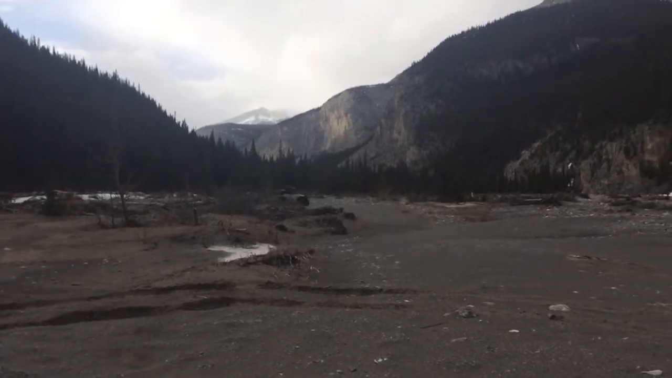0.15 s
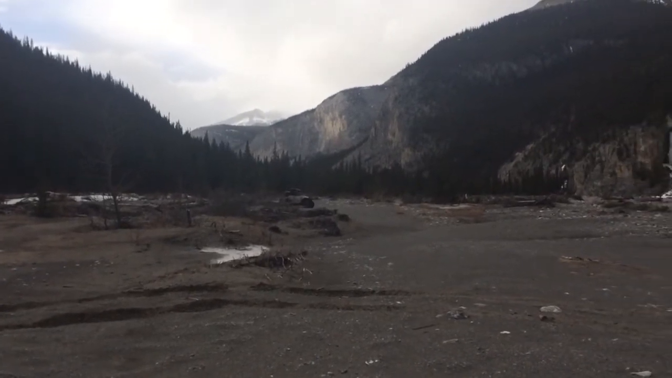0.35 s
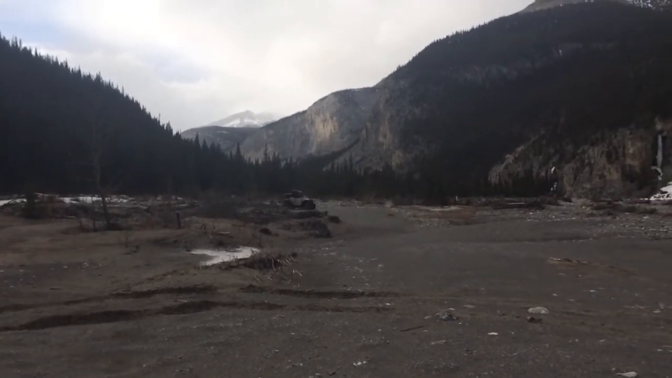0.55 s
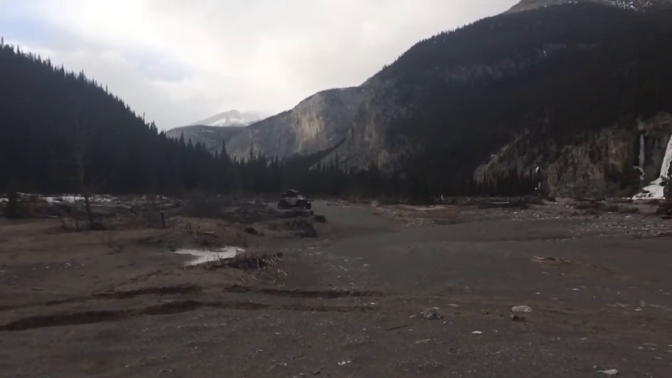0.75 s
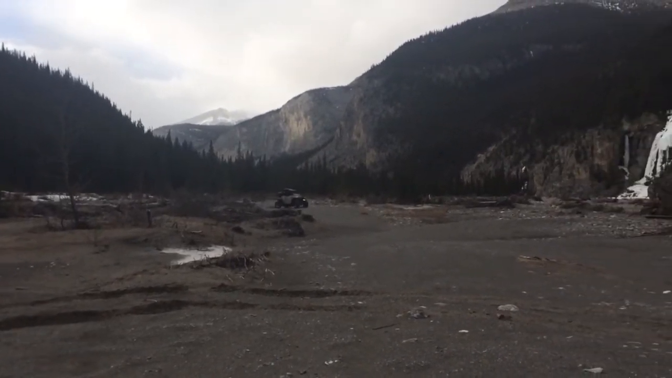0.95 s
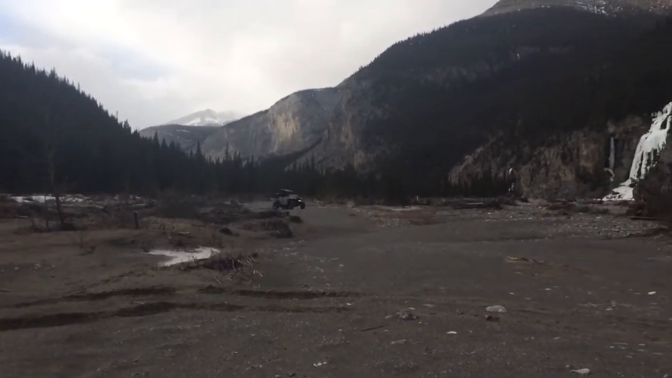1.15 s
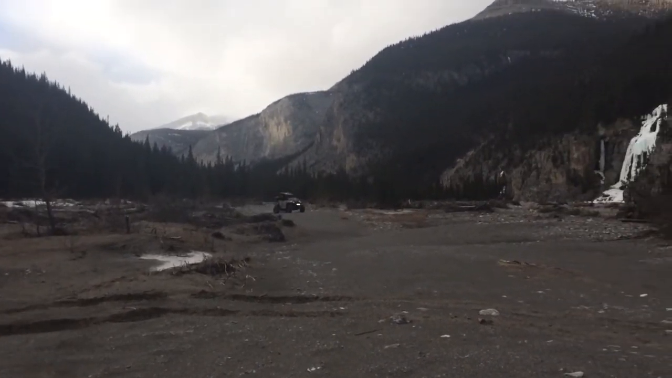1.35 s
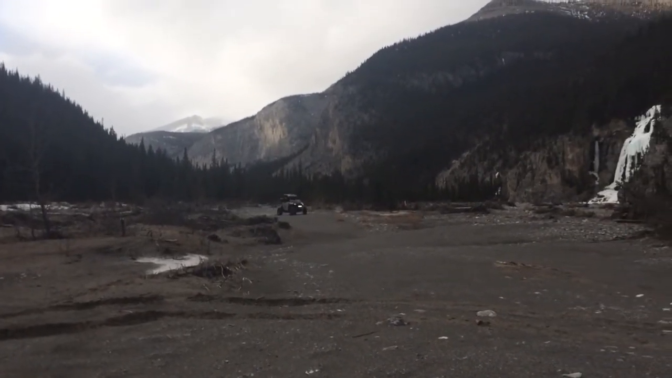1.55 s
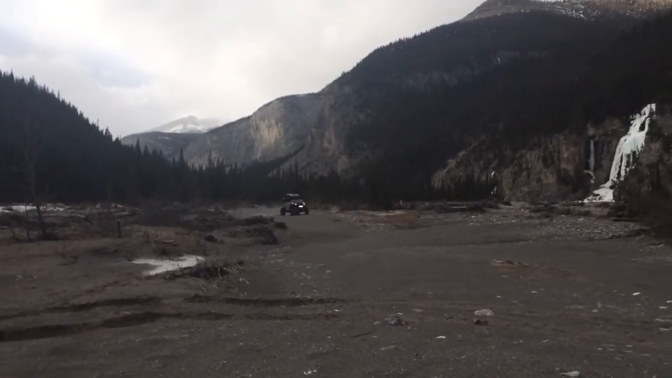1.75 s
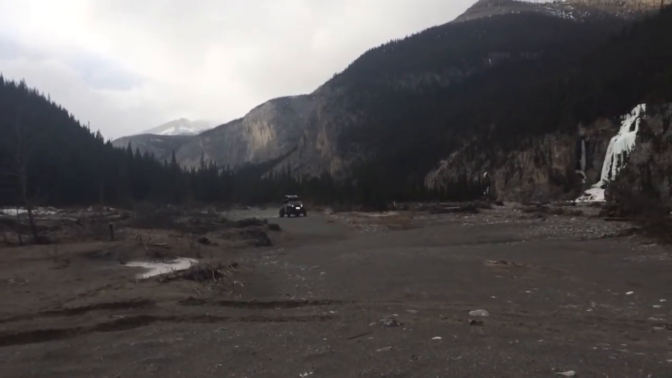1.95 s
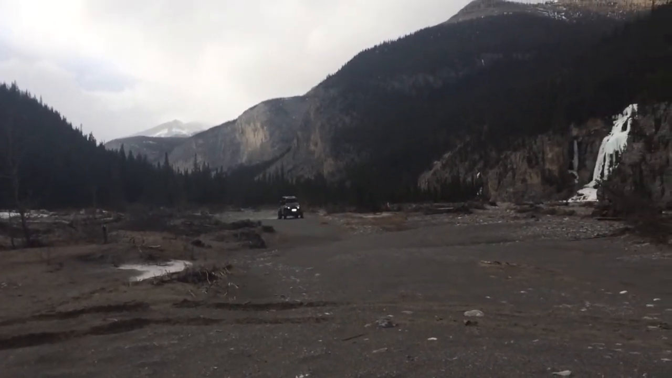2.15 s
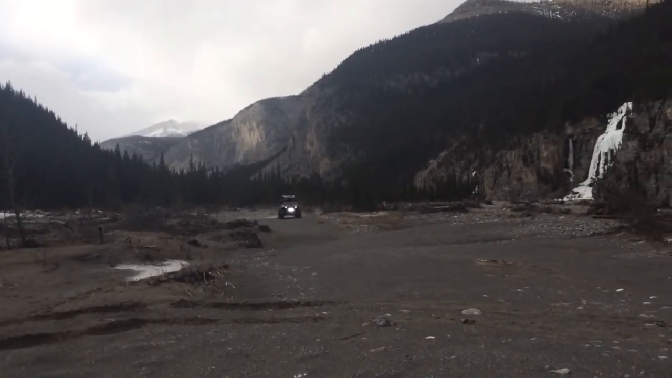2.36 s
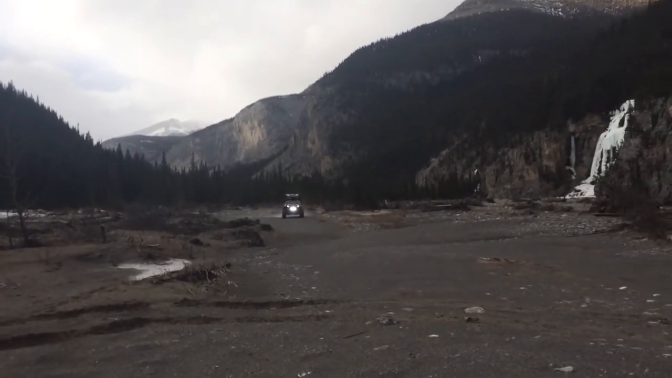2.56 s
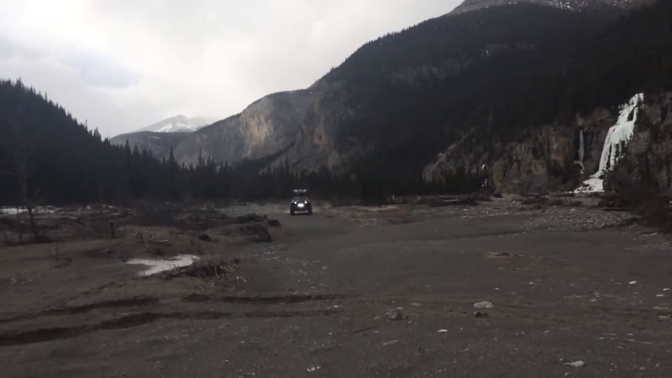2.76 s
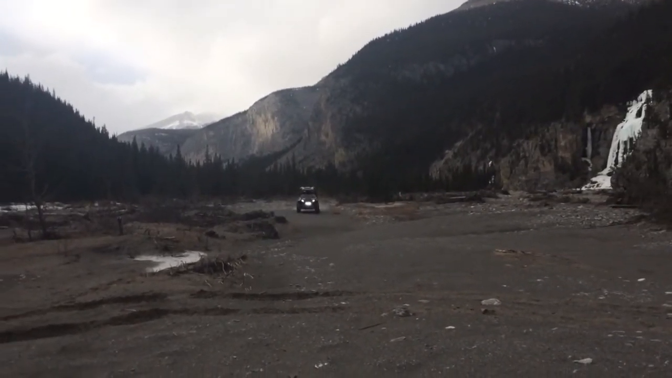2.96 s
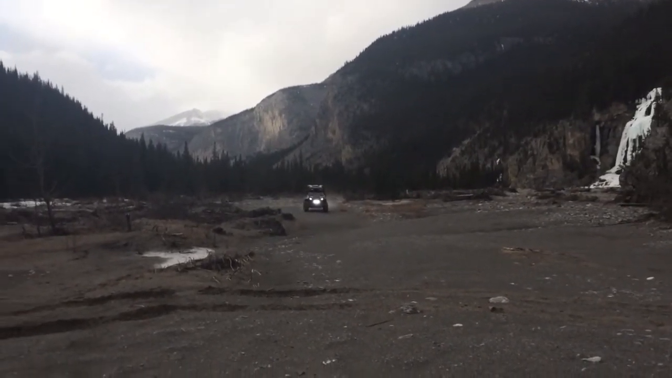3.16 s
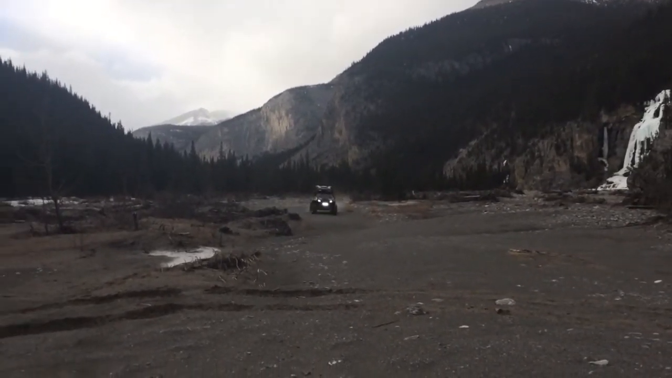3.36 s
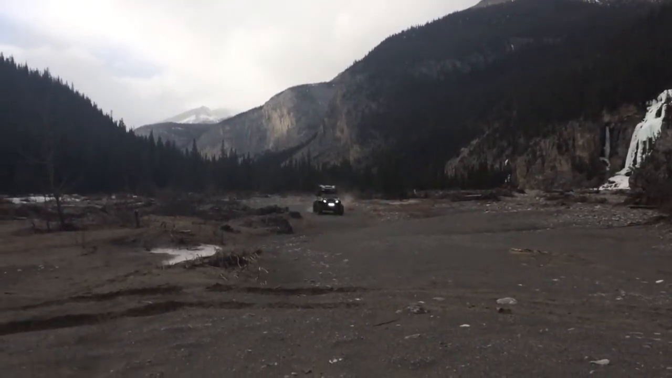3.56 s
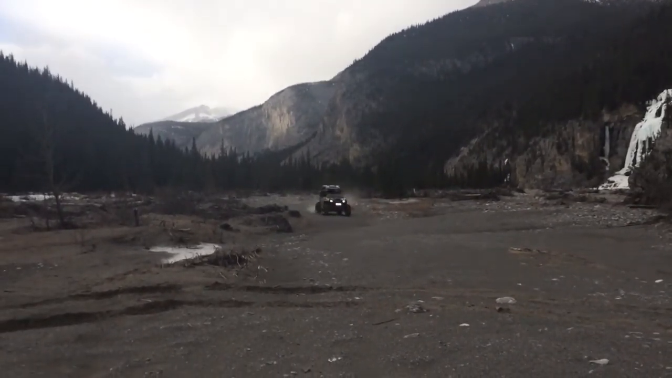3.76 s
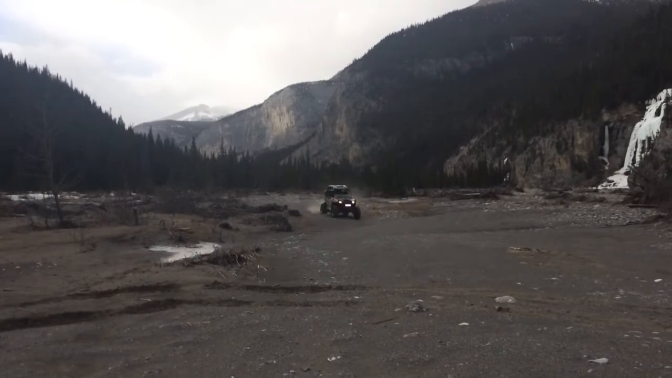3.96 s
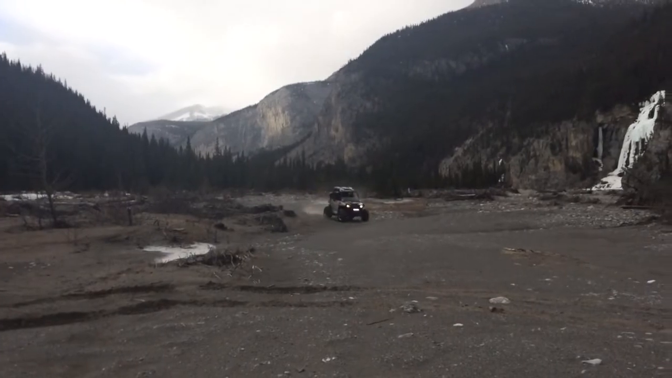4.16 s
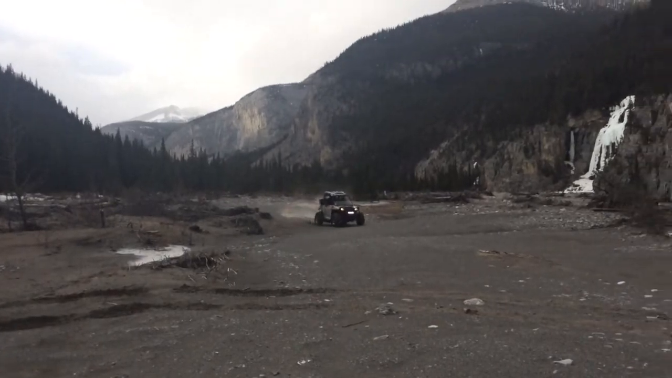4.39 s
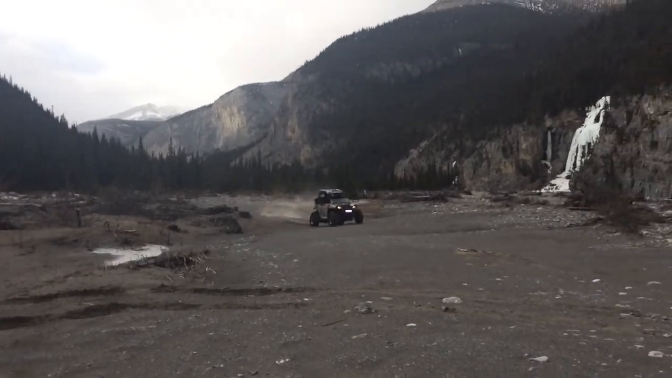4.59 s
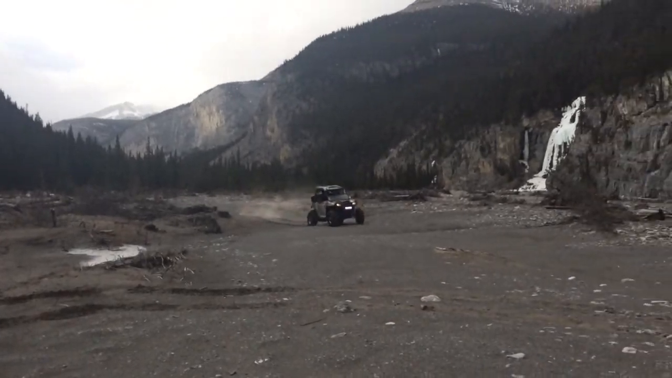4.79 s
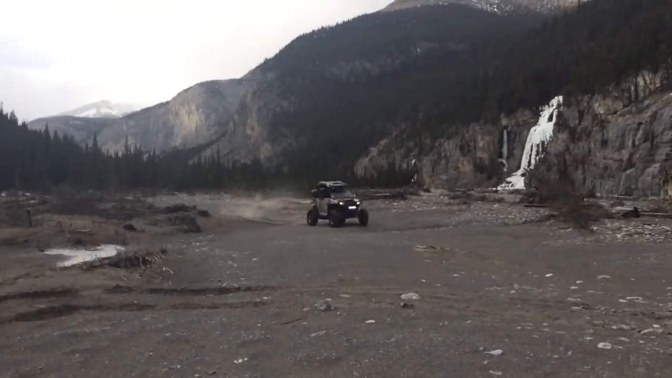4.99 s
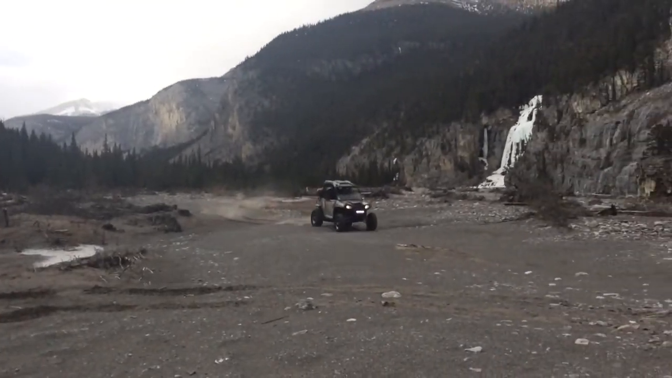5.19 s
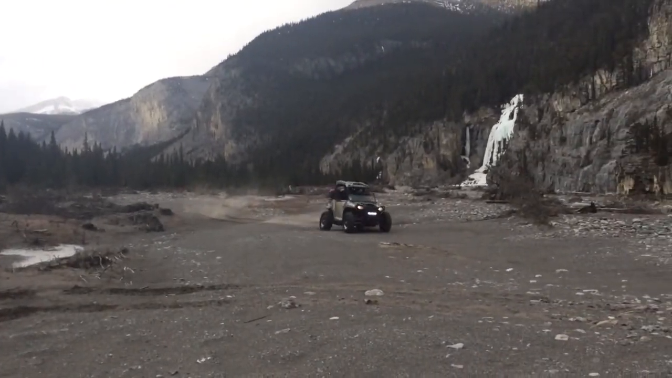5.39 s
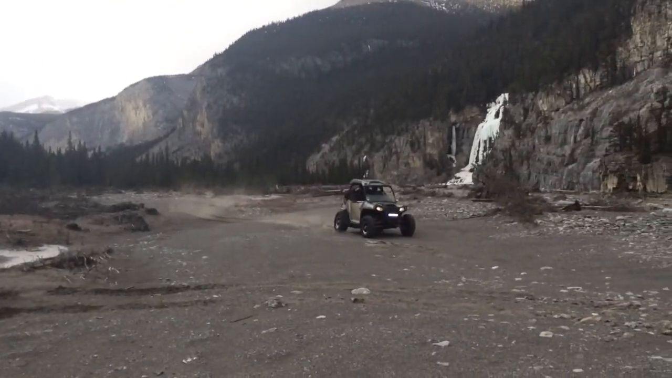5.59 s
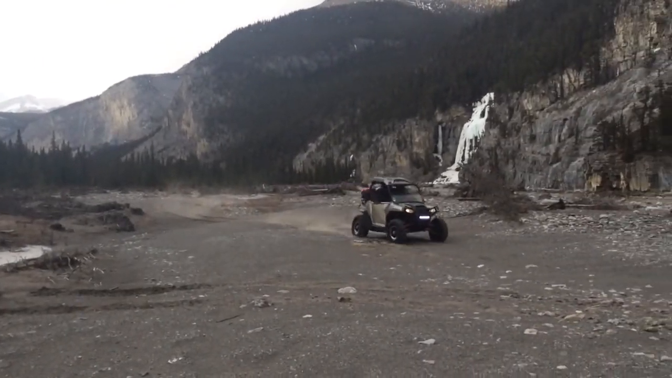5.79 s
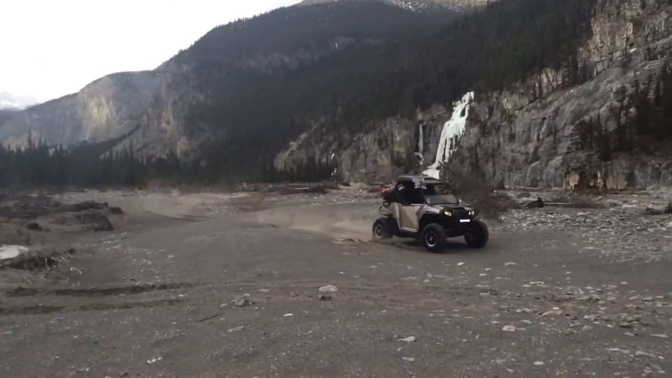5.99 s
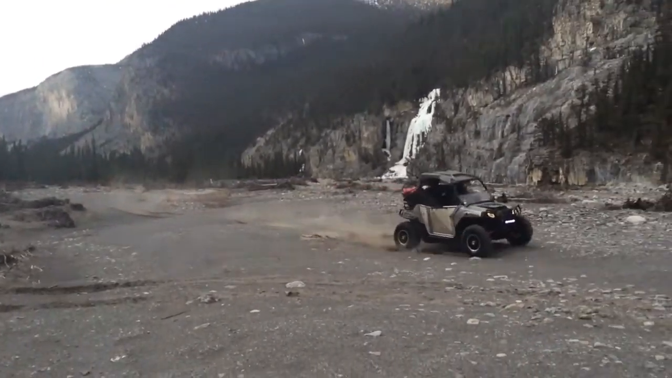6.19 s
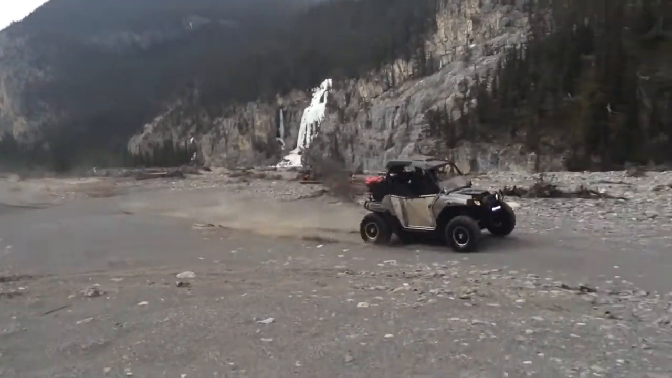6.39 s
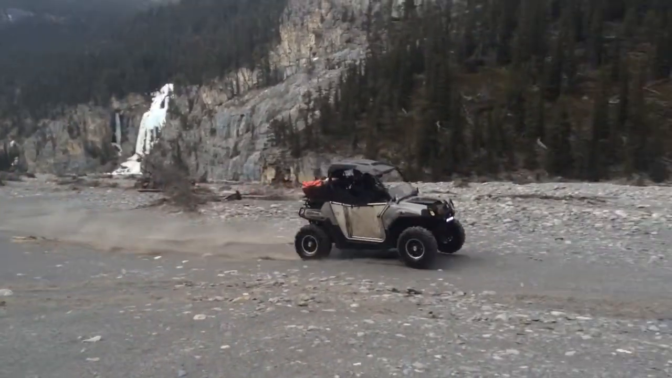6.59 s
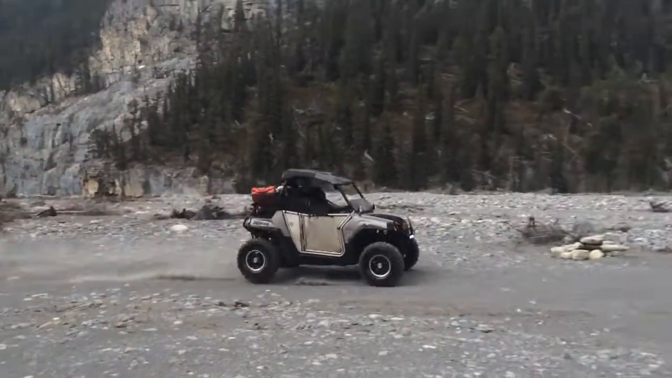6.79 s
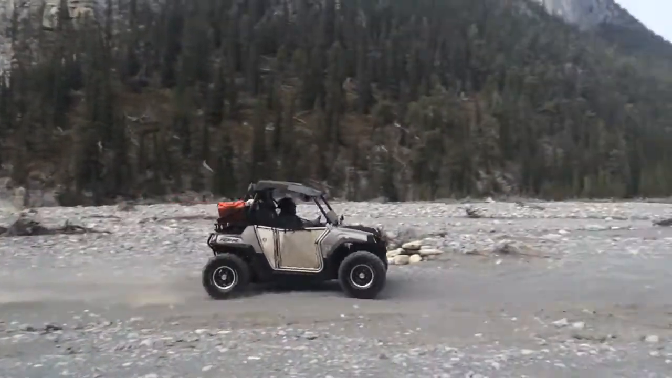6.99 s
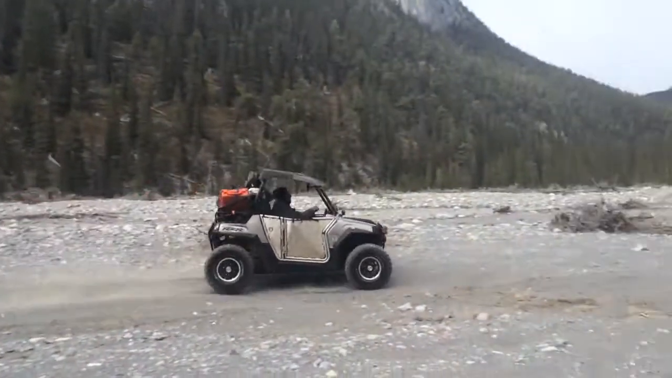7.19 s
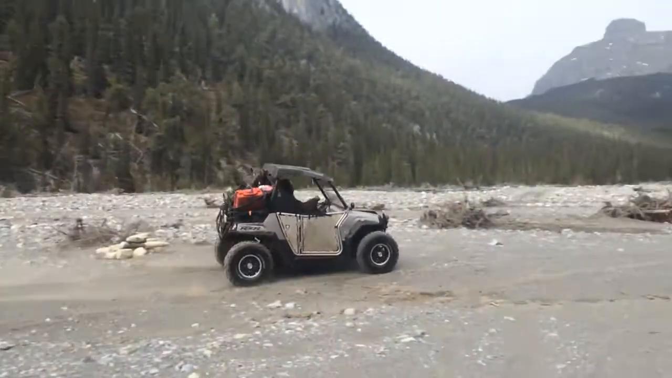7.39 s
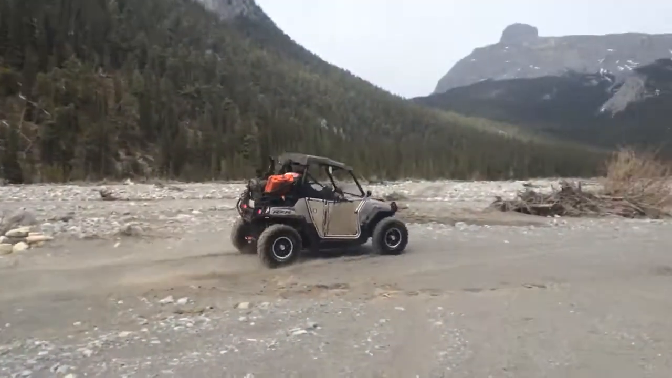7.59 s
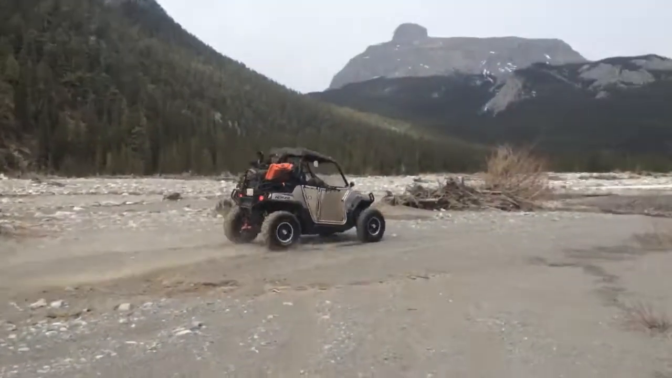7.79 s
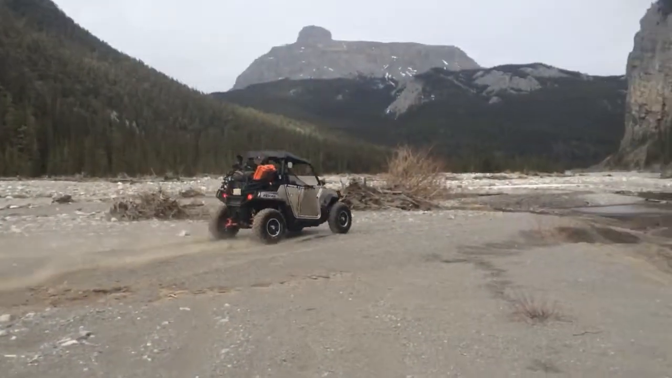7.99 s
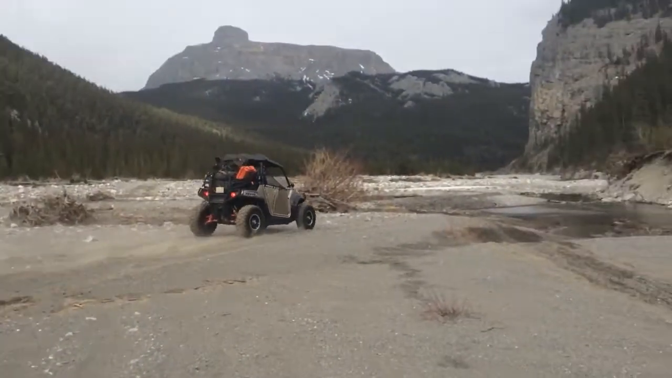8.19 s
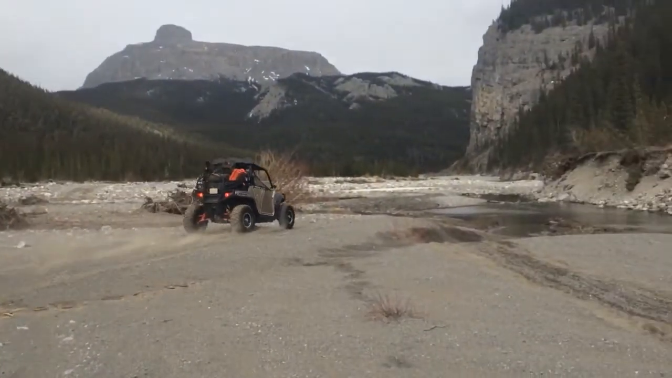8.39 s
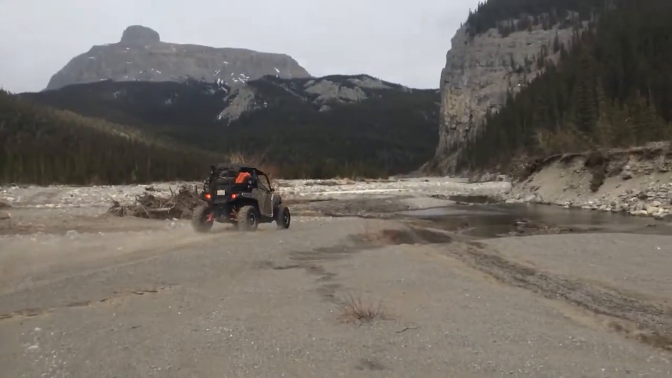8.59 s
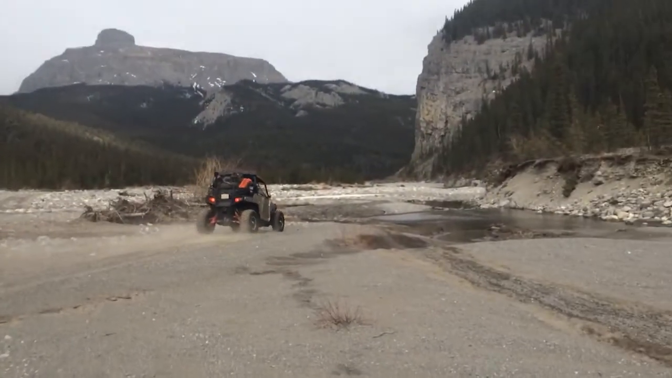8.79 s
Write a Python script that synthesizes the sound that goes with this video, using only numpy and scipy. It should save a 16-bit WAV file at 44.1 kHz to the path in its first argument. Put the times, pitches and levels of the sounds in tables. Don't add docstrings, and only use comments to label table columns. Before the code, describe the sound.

Off-road buggy engine drones nearer in an open valley, tyres roaring on gravel, passes, then drops in pitch as it coasts off amid wind rumble.

```python
import sys
import numpy as np
from scipy import signal
from scipy.fft import rfft, irfft, next_fast_len
from scipy.io import wavfile
from scipy.ndimage import uniform_filter1d, map_coordinates

SR = 44100
rng = np.random.default_rng(int(sys.argv[2]) if len(sys.argv) > 2 else 0)


def level_to_linear(level):
    exponent = np.asarray(level, float) / 20
    return 10 ** exponent


def file_out(sig):
    cols = np.atleast_2d(sig).T
    lim = np.clip(cols, -1, 1)
    pcm = np.round(lim * 32767).astype(np.int16)
    wavfile.write(sys.argv[1], SR, pcm)


N = 390285


def rms_one(x):
    return x / np.sqrt(np.mean(x ** 2) + 1e-20)


def in_time(rows):
    s, *columns = np.transpose(rows)
    return [np.interp(np.arange(N) / SR, s, column) for column in columns]


def bumps(rows):
    t = np.arange(N) / SR
    return sum(np.interp(t, [s - half, s, s + half], [0, height, 0]) for s, height, half in rows)


def drift(rate, size=1):
    r = np.exp(-80 * np.pi * rate / SR)
    slow = signal.lfilter([1], [1, -2 * r, r * r], rng.standard_normal(N // 40 + 2002))[2000:]
    return np.interp(np.arange(0, N, size) / 40, np.arange(len(slow)), rms_one(slow))


def band_pass(x, low_hz, high_hz):
    return signal.sosfilt(signal.butter(2, [low_hz, high_hz], "band", fs=SR, output="sos"), x)


def coloured(x, spectrum):
    hz, db = np.transpose(spectrum)
    size = next_fast_len(N)
    f = np.maximum(np.fft.rfftfreq(size, 1 / SR), 1)
    octaves_outside = np.maximum(np.log2(hz[0] / f), 0) + np.maximum(np.log2(f / hz[-1]), 0)
    gain = level_to_linear(np.interp(np.log(f), np.log(hz), db) - 45 * octaves_outside)
    return rms_one(irfft(rfft(x, size) * gain, size)[:N])


def patchy(spectrum, patchy_db, rate, count):
    lowest, highest = spectrum[0][0] / 1.3, min(spectrum[-1][0] * 1.3, 19000)
    edges = np.geomspace(lowest, highest, count + 1)
    white = rng.standard_normal((2, N))
    together = drift(rate / 3)
    out = 0
    for k, (low, high) in enumerate(zip(edges, edges[1:])):
        band = band_pass(white[k % 2], low, high)
        out = out + band * level_to_linear(patchy_db * (0.92 * together + drift(rate)))
    return coloured(out, spectrum)


# start_s, pitch_hz
FIRING_RATE = [(0, 75.3), (.17, 78.9), (.53, 77.76), (.7, 72.25), (1.05, 87.2), (2.34, 88.25),
               (2.56, 91.97), (3.35, 94.63), (4.72, 94.6), (5.05, 98.05), (5.27, 105.6), (6.4, 105.3),
               (6.53, 100.9), (6.8, 101.5), (6.93, 90.7), (7.64, 78.7), (8.13, 67.73), (8.85, 57.7)]
# centre_s, change_hz, half_length_s
ENGINE_SURGES = [(.9, -1.76, 0.1475), (1.26, 1.5, .15), (1.53, -3.5, .3), (1.9, 1.14, 0.301),
                 (3.8, 1.07, 0.3023), (4.49, 2.5, .19), (4.88, 2, 0.1076), (5.4, -0.61, 0.081),
                 (5.59, 3.5, 0.1286), (5.79, -6.5, .18), (6.02, -1.65, 0.1582), (6.41, 1.92, .1),
                 (6.78, 1.5, 0.055), (7.3, -0.94, .35), (8.52, -1.6, .2)]


def firing():
    hz = in_time(FIRING_RATE)[0] + bumps(ENGINE_SURGES)
    uneven_hz = hz * (1 + .002 * drift(20))
    return hz, 2 * np.pi * np.cumsum(uneven_hz) / SR


# centre_s, pitch_hz, change_db, half_length_s
CROSSING_PATHS = [(.6, 225, -20, .3), (1.17, 260, -12, .2), (3.4, 860, 4.5, .5), (3.81, 952, 12, .25),
                  (1.95, 575, -21, 0.4), (2.381, 573, 8, 0.19), (6.7, 605, 7, 0.12), (3.81, 380, -14, 0.24),
                  (3.87, 460, -14, 0.13), (4.138, 410, -12, 0.11), (4.407, 384, 4, .13),
                  (4.93, 373, -16, 0.044), (5.3, 315, -11, 0.62), (5.58, 314, -16, .09),
                  (5.97, 320, -10.5, 0.088), (5.7, 490, 2.5, 0.26), (5.803, 1120, -18, 0.09),
                  (6.56, 1040, -13, 0.17), (6.66, 800, -15, 0.15), (6.393, 467, -14, 0.11),
                  (7.15, 261, 14.5, 0.5), (7.1, 85, 8, 0.5), (7.101, 460, -6, 0.31), (7.056, 700, 15, 0.19),
                  (8.0, 790, -10, .25), (8.3, 425, -8.5, 0.34), (8.26, 610, 10.5, 0.13),
                  (8.5, 62.07, -8.5, 0.78), (8.602, 510, 9.5, 0.32)]


def paths(hz, step):
    width_hz = 71
    t, db = np.arange(len(hz)) * step / SR, np.zeros(len(hz))
    for s, centre, change_db, half in CROSSING_PATHS:
        start = max(int((s - 2 * half) * SR / step), 0)
        near = slice(start, int((s + 2 * half) * SR / step))
        time_part = ((t[near] - s) / half) ** 2
        pitch_part = ((hz[near] - centre) / width_hz) ** 2 * 1000 / centre
        db[near] += change_db * np.exp(-time_part - pitch_part)
    return db


# start_s, tail_db, nose_db
EXHAUST_LEVELS = [(0, -37.5, -64), (.5, -32, -57), (.96, -30, -53.5), (1.1, -40.5, -52), (1.56, -32.5, -48),
                  (1.72, -47, -52.5), (2.24, -39, -46.5), (2.8, -42.5, -40), (3.5, -44, -37),
                  (4.3, -48.5, -36), (5.3, -39, -37), (6.3, -45.5, -33.5), (6.56, -32, -31.5),
                  (6.7, -41, -32.5), (6.84, -23, -36.5), (7.25, -29, -41.5), (7.7, -22.5, -46.5),
                  (8.85, -24.5, -37.5)]


def exhaust(hz, phase):
    tail_db, nose_db = in_time(EXHAUST_LEVELS)
    tail_orders_db, nose_orders_db = [-10, -0.2, -15.5, -25], [-0.1, -12.5, -2, -1.5]
    order_phases = [0, 3.1, 3.1, 4.3]
    out = 0
    for k in range(4):
        order = k + 1
        level = np.hypot(level_to_linear(tail_db + tail_orders_db[k]), level_to_linear(nose_db + nose_orders_db[k]))
        stir_db = paths(order * hz, step=0.96) + 1.85 * drift(16)
        out = out + np.sqrt(2) * level * level_to_linear(stir_db) * np.cos(order * phase + order_phases[k])
    return out


# start_s, level_db, dullness_db, air_box_ring_db, depth_db of the dips beside the ring
INTAKE_BARK = [(0, -50, -10, -9, 20), (.2, -46, -6.5, -10, 20), (.53, -47.5, -18, -1, 25),
               (.57, -55.5, -1, -6, 8), (.75, -57, -1, -9, 7), (.92, -42.5, -6, -3, 13),
               (1.5, -41, -0.5, -8.5, 14), (1.66, -36.5, -1.5, -8.5, 11), (2.4, -35.5, -9, -4, 16),
               (3.1, -40, 4, 2.5, 20), (3.4, -39, 3.5, 8.5, 20), (3.8, -36.5, -1.6, 3.5, 16.5),
               (5.1, -31, 3, -3, 11.5), (5.9, -31, 2.5, -5.5, 3), (6.4, -36.5, 5, 5, -2),
               (6.75, -33.5, 7.5, -4, -2), (6.9, -39, 0.5, -5, 12), (8.85, -51, 7, -8.5, 1)]
BARK_HZ = [487, 568, 800, 1173, 1410, 1890]
BARK_TRIM_DB = [-4, -8, -2, -19, -16, -29.5]
# pitch_hz, width_hz
SIDE_BRANCH_DIPS = [
    (750, 83),
    (955, 13),
]
# start_s, phase_scatter_rad
BARK_SCATTER = [
    (0, .5),
    (1.5, .15),
    (2.4, .15),
    (3.0, .8),
    (3.9, .8),
    (4.3, .35),
    (4.7, .5),
    (5.2, 1.6),
    (6.8, 1.8),
    (8.85, 2.4),
]


def intake(hz, phase):
    level_db, dull_db, ring_db, dip_db = [curve[::5] for curve in in_time(INTAKE_BARK)]
    opens_s, shuts_s, move_s = 1.0, 6.85, .2
    part_hz, wide_hz = 1370, 1156
    throttle = [(opens_s - move_s, part_hz), (opens_s, wide_hz), (shuts_s - move_s, wide_hz), (shuts_s, part_hz)]
    snorkel_hz = in_time(throttle)[0][::5]
    scatter = in_time(BARK_SCATTER)[0][::5]
    tops = np.array([level_db + dull_db, level_db + 0.24 * dull_db, level_db + ring_db,
                     level_db, level_db + 0.25 * dull_db, level_db + .9 * dull_db])
    tops = tops + np.array(BARK_TRIM_DB)[:, None]
    steps, out = np.arange(len(level_db)), 0
    for order in range(5, 24):
        f = order * hz[::5]
        place = np.interp(f, BARK_HZ, np.arange(6))
        db = map_coordinates(tops, [place, steps], order=1, mode="nearest") + paths(f, step=5)
        for centre, width in SIDE_BRANCH_DIPS:
            db = db - dip_db * np.exp(-((f - centre) / width) ** 2)
        db = db + 8.5 * np.exp(-((f - snorkel_hz) / 124) ** 2)
        db = db + (1.5 + .35 * scatter) * drift(3.4, size=5)
        lead = np.pi * 0.002 * ((order - 13) * 92) ** 2 / 1000
        lead = lead + scatter * rng.standard_normal()
        out = out + np.sqrt(2) * level_to_linear(db) * np.cos(order * phase[::5] + lead + .2 * drift(8, size=5))
    return signal.resample_poly(out, 5, 1)[:N]


# start_s, level_db
GEAR_LEVEL = [(0, -51.5), (.69, -55), (.8, -49), (1.0, -44.5), (1.18, -44.5), (1.4, -51.5), (2.5, -50.5),
              (3.7, -52), (4.41, -43), (5.0, -42.5), (5.15, -38.5), (5.9, -38), (6.11, -34), (7.3, -33.5),
              (8.35, -35.5), (8.5, -40), (8.85, -41)]
# centre_s, roar_db, hiss_and_spray_db
RUT_JOLTS = [
    (5.702, 5, -2),
    (5.89, -7, -0.7),
    (6.11, 3, -0.3),
    (6.709, -3, 3),
    (7.401, 2, 3),
    (7.54, 0.5, 0.5),
    (8.5, 2, 6.5),
    (8.632, .1, 4),
    (8.778, -2, 4),
]


def gear_levels():
    gear_db, bark_db = in_time(GEAR_LEVEL)[0], in_time(INTAKE_BARK)[0]
    jolt_s = 0.083
    roar_db = 2 + 0.54 * gear_db + .55 * bark_db + bumps([(s, db, jolt_s) for s, db, _ in RUT_JOLTS])
    hiss_db = gear_db + bumps([(s, db, jolt_s) for s, _, db in RUT_JOLTS])
    spray_db = -12 + hiss_db + 0.27 * bark_db
    return roar_db, hiss_db, spray_db


# pitch_hz, level_db per Hz
ROAR_SPECTRUM = [(150, -18), (300, -2), (600, 3), (900, 0), (1300, 0), (1700, -1.5)]


def tyre_roar(roar_db, throb):
    return level_to_linear(roar_db) * throb * patchy(ROAR_SPECTRUM, patchy_db=2.0, rate=30, count=7)


# pitch_hz, level_db per Hz
HISS_SPECTRUM = [(1500, -6.5), (1700, -3.5), (1950, 1.5), (2250, -7), (2600, -2), (3000, 2), (3350, -1.5),
                 (3700, -10.5), (4300, -23.5)]


def belt_hiss(hiss_db, throb):
    return level_to_linear(hiss_db) * throb * patchy(HISS_SPECTRUM, patchy_db=1.0, rate=11, count=6)


# pitch_hz, level_db per Hz
SPRAY_SPECTRUM = [(4000, 2.1), (4600, -4.1), (5300, -5), (6300, -12.5), (8000, -21), (10000, -25.5),
                  (12500, -30.5), (15000, -40.5)]


def gravel_spray(spray_db):
    sizes = level_to_linear(1.6 * np.minimum(rng.exponential(1, N), 5)) * rng.choice([-1, 1], N)
    grit = sizes * (rng.random(N) < 6000 * level_to_linear(1.2 * drift(30)) / SR)
    return level_to_linear(spray_db + 5) * coloured(grit, SPRAY_SPECTRUM)


# start_s, level_db
TOOTH_LEVEL = [
    (2.4, -95),
    (2.8, -63),
    (3.4, -61),
    (4.1, -62),
    (4.4, -95),
]


def gear_tooth(phase):
    return level_to_linear(in_time(TOOTH_LEVEL)[0]) * np.cos(24 * phase)


def running_gear(phase):
    roar_db, hiss_db, spray_db = gear_levels()
    throb = 1 + 0.15 * np.cos(phase + 0.93)
    return tyre_roar(roar_db, throb) + belt_hiss(hiss_db, throb) + gravel_spray(spray_db) + gear_tooth(phase)


# start_s, pitch_hz, level_db
BELT_HOWL = [(0, 3040, -56.5), (1.1, 3010, -63), (3.5, 2805, -64), (3.9, 2850, -50.5), (4.4, 3050, -44.5),
             (4.8, 3050, -43.5), (5.2, 3200, -41.5), (5.7, 3100, -51), (6.2, 3250, -42), (6.85, 3250, -36),
             (7.05, 2980, -37.5), (7.4, 2850, -38.5), (7.7, 2600, -42), (8.15, 2300, -39), (8.3, 2150, -53),
             (8.55, 1880, -40), (8.85, 1700, -53)]


def howl():
    hz, db = in_time(BELT_HOWL)
    narrow = signal.sosfilt(signal.butter(2, 110, fs=SR, output="sos"), rng.standard_normal((2, N)))
    turn = 2 * np.pi * np.cumsum(hz) / SR
    return level_to_linear(db + 2.13 * drift(25)) * rms_one(narrow[0] * np.cos(turn) + narrow[1] * np.sin(turn))


# start_s, peak_db
STONE_HITS = [
    (0.808, -51),
    (2.4163, -40.5),
    (2.87, -50),
    (7.388, -43.5),
    (8.4714, -45),
]


def stones():
    clicks = np.zeros(N)
    for s, db in STONE_HITS:
        clicks[round(s * SR) + 30] = level_to_linear(db + 6)
    return band_pass(clicks, 2800, 13000)


# centre_s, level_db
GRIT_THROWS = [
    (6.45, -70),
    (6.75, -71),
    (7.5, -75),
    (8.12, -70.5),
    (8.3, -69),
    (8.52, -69),
    (8.78, -73.5),
]


def throws():
    t, shower = np.arange(N) / SR, np.zeros(N)
    for s, db in GRIT_THROWS:
        near = slice(max(round((s - .2) * SR), 0), round((s + .2) * SR))
        shower[near] += level_to_linear(db) * np.exp(-((t[near] - s) / .11) ** 2)
    grit = rng.standard_normal(N) * level_to_linear(3.5 * drift(70))
    return shower * rms_one(band_pass(grit, 5500, 12500))


# centre_s, peak_db, rise_and_fall_s
WIND_GUSTS = [(.05, -50.5, 0.027), (.37, -47, 0.033), (0.469, -58, .03), (1.001, -38.5, .12),
              (1.11, -42.5, 0.027), (1.25, -49.5, 0.11), (1.618, -27.5, .04), (1.9, -38, .1),
              (2.14, -45, .04), (2.34, -48, 0.044), (2.56, -48, .05), (2.71, -51, 0.053),
              (2.881, -38, 0.029), (3.1, -44, .1), (3.4, -51.5, 0.11), (3.72, -49.5, .1),
              (4.1, -48.5, 0.082), (4.419, -38, 0.021), (4.601, -48.5, 0.14), (5.1, -48.5, 0.062),
              (5.4, -49.5, 0.046), (5.55, -50, .04), (5.699, -44, 0.22), (6.04, -41.5, 0.077),
              (6.139, -48, 0.1), (6.519, -36, 0.22), (6.85, -28.5, .08), (7.438, -38, 0.094),
              (7.599, -44.5, 0.3), (8.3, -41.5, .4)]
# pitch_hz, level_db per Hz
WIND_SPECTRUM = [(20, -21), (35, -6), (60, 2), (100, -1), (150, -1), (230, -10.5), (350, -31), (500, -38.5)]
# start_s, level_db
WIND_DEPTH_DB = [
    (0, 4.5),
    (2, -2),
    (4, 6.5),
    (5.3, -2),
    (5.7, -9.5),
    (6.9, -14.5),
    (7.2, -2),
    (8.85, 3),
]
# centre_s, change_db, half_length_s
WIND_LULLS = [
    (2.97, -20, .07),
    (7.17, -14, .12),
]


def wind():
    t = np.arange(0, N, 40) / SR
    gusts = level_to_linear(-55.5)
    for s, db, fall in WIND_GUSTS:
        gusts = gusts + level_to_linear(db) * np.exp(-np.abs(t - s) / fall)
    gusts = np.interp(np.arange(N) / SR, t, gusts) * level_to_linear(bumps(WIND_LULLS))
    air = patchy(WIND_SPECTRUM, patchy_db=0.0, rate=15, count=3)
    swell = uniform_filter1d(uniform_filter1d(air ** 2, size=1500), size=1500)
    air = air / np.sqrt(swell + 0.029)
    deep = signal.sosfiltfilt(signal.butter(2, 80, fs=SR, output="sos"), air)
    depth_db = in_time(WIND_DEPTH_DB)[0]
    return level_to_linear(5) * gusts * (air + (level_to_linear(depth_db) - 1) * deep)


def noise_floor():
    return level_to_linear(-81) * rng.standard_normal(N)


def scene():
    hz, phase = firing()
    engine = -exhaust(hz, phase) - intake(hz, phase)
    buggy = engine + running_gear(phase) + howl() + stones() + throws()
    return (buggy + wind() + noise_floor())[None]


def low_pass(x):
    return signal.sosfilt(signal.butter(12, 15290, fs=SR, output="sos"), x)


def record(dry):
    return low_pass(dry)


dry = scene()
out = record(dry)
file_out(out)
```